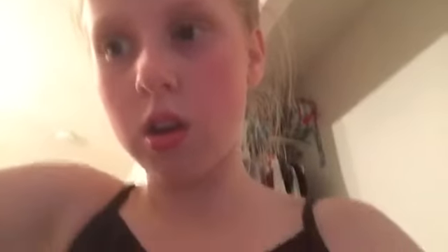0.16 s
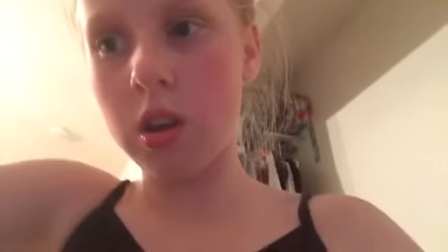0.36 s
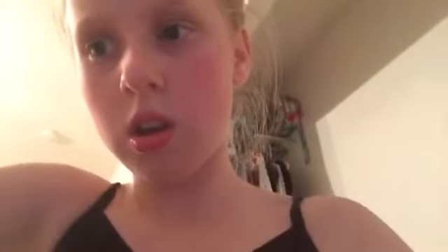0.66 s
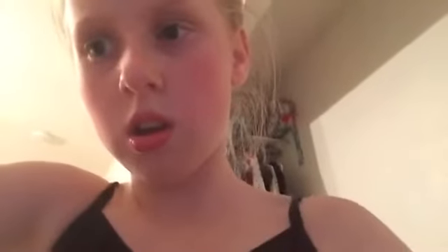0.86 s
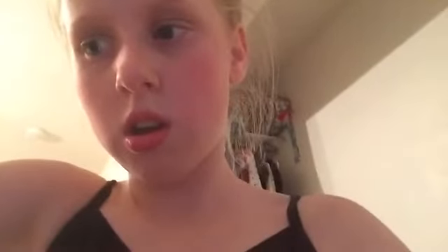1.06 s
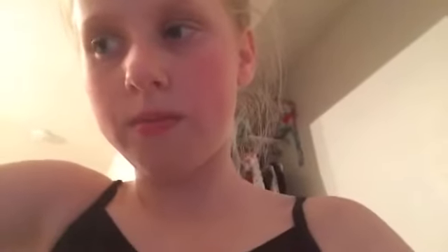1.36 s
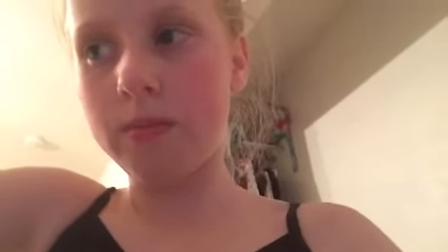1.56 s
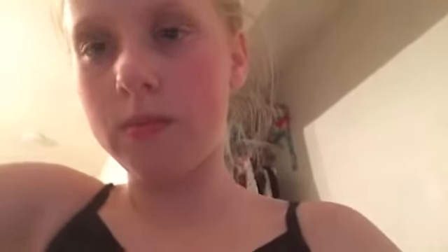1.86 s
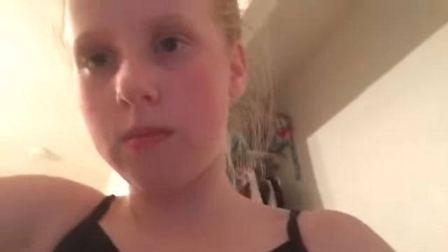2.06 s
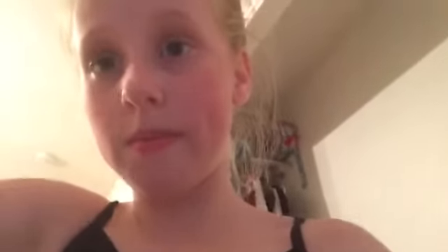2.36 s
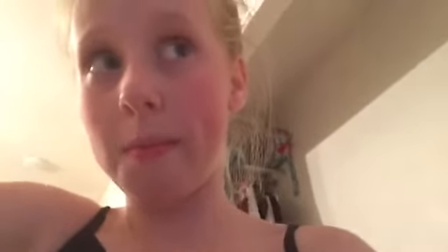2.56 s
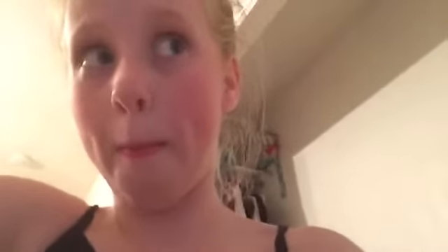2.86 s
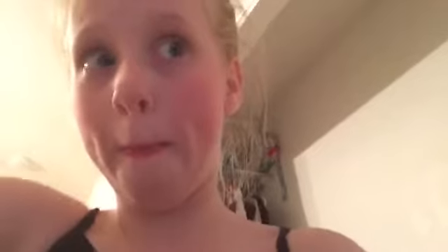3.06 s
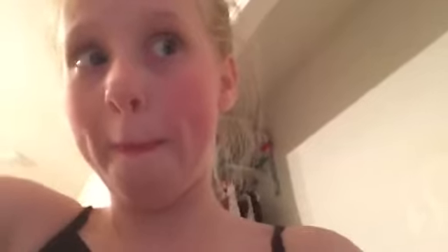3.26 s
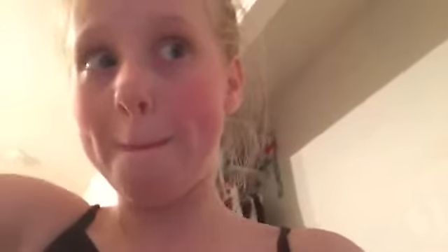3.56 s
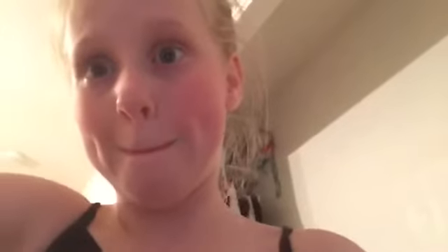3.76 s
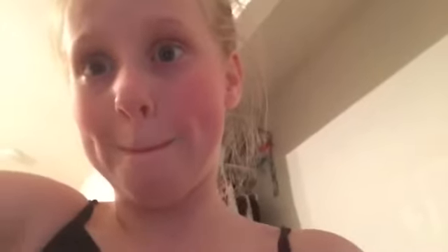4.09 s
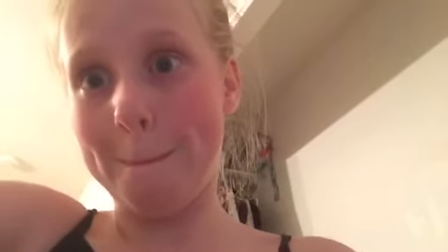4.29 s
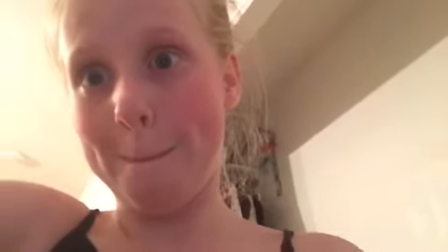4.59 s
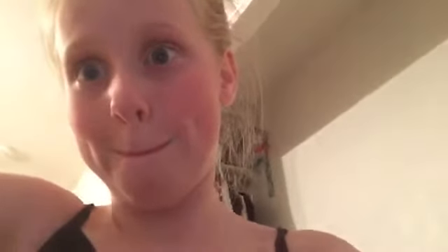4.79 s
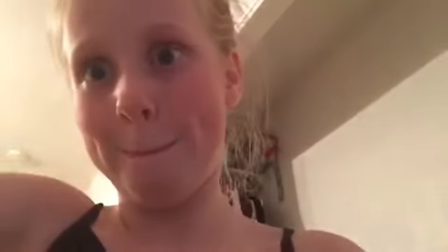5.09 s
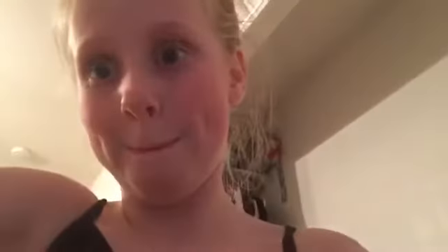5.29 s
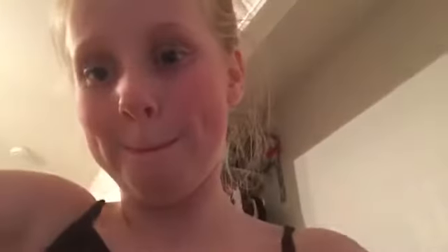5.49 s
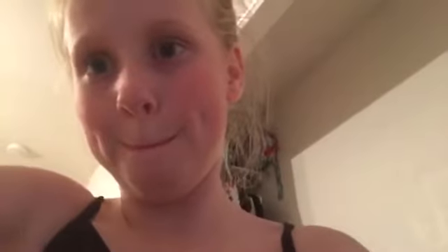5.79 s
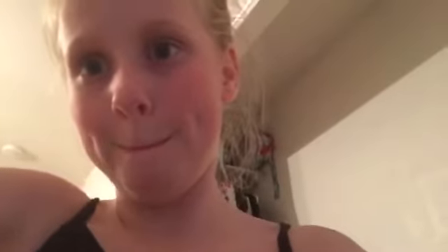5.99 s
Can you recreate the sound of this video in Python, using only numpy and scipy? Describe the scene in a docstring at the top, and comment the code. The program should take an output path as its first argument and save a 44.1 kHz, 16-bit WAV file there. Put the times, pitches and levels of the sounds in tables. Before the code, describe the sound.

Rapid, regular fingertip taps on a small hand-held ceramic bowl, each a dull hollow knock with a light click, after brief scuffing and drumming.

```python
"""A small ceramic bowl, close to a phone's microphone: fingers scuff, knock and roll over it for a second,
then tap its bottom about six times a second. Each tap is a nail click and a hollow, hand-damped knock,
higher and brighter the harder it lands; then the finger slides off with a stick-slip rasp. Skin squeaks faintly.
A small quiet room returns a few echoes and a short tail; the phone hushes the pauses and cuts the top.
"""
import sys
import numpy as np
from scipy import signal
from scipy.fft import rfft, irfft
from scipy.io import wavfile
from scipy.ndimage import uniform_filter1d

SR = 44100
rng = np.random.default_rng(int(sys.argv[2]) if len(sys.argv) > 2 else 0)


def master(y):
    """Save y as 16-bit WAV."""
    cut = np.clip(np.atleast_2d(y).T, -1, 1)
    pcm = np.round(cut * 32767)  # scale
    wavfile.write(sys.argv[1], SR, pcm.astype(np.int16))


N = 270774

# still room air, relative colour: (frequency [Hz], level [dB])
AIR_COLOUR = [(30, -21.5), (80, -16.5), (140, 10), (300, -1.5), (600, -6.5), (1200, -21), (4000, -24),
              (9000, -33.5), (15000, -39.5)]
# fingertips dragging over the glaze:
# (time [s], length [s], rasp level [dB], flatness of the finger as body level relative to the rasp [dB])
SCUFF_STROKES = [(0.002, 0.023, -45, 3), (0.047, 0.085, -62, 9), (0.138, 0.0092, -42, 7),
                 (0.185, 0.037, -64.5, 7), (0.232, 0.016, -52.5, 10.5), (0.348, .03, -43.5, 2),
                 (0.4, 0.046, -51, 0.5), (0.565, 0.019, -41.5, 5), (0.617, 0.047, -49.5, 0.5),
                 (0.705, 0.038, -52, 2), (0.753, 0.04, -42, 3), (0.835, 0.023, -52, -5),
                 (0.923, 0.046, -58, 4.5), (0.983, 0.03, -42, 0), (1.045, 0.029, -58, 3.5),
                 (1.268, 0.059, -62.5, -5), (1.879, 0.016, -52.5, 2.5), (2.556, 0.033, -63, -7),
                 (2.735, 0.053, -61.5, 0), (3.05, 0.031, -52.5, -35.5), (3.629, 0.046, -75, 12),
                 (4.355, 0.013, -48.5, 5), (4.787, 0.038, -68, 9), (4.9, 0.041, -64, -9),
                 (5.453, 0.03, -71.5, 12.5), (5.609, 0.035, -72, -1)]
# colour of hard contact on the glaze: (frequency [Hz], level [dB])
CONTACT_COLOUR = [(300, -31), (950, -14.5), (1500, -8.5), (2100, -8.5), (3200, -4.5), (4000, -6.5),
                  (5100, -7), (6300, -11.5), (7300, -18), (9000, -24), (11500, -32.5), (13500, -32),
                  (15500, -41.5)]
# short ring of the ceramic, before each contact varies it: (frequency [Hz], relative level [dB], t60 [s])
CERAMIC_RING = [(1514, -0.5, 0.014), (1840, -3.5, .022), (2369, -2, 0.059), (2290, -9, 0.018),
                (2858, -7.5, 0.072), (3392, -3.5, 0.054), (3330, -5, 0.021), (3880, -8, 0.034),
                (4750, -18.5, 0.016), (4930, -14.5, 0.015), (4980, -9.5, 0.053), (6120, -20.5, .015),
                (5930, -19, 0.03)]
# broad resonances of the gripped wall at pitch ratio 1: (frequency [Hz], width [Hz])
WALL_RESONANCES = [(236, 48), (343, 112)]
# resonance of the base: (frequency [Hz], width [Hz], level [dB])
BASE_RESONANCE = (795, 79, 16.95)
# diffuse room tail: (band centre [Hz], level [dB], t60 [s])
ROOM_BANDS = [(70, -30.5, 0.7), (142, 8, 0.075), (252, -13, 1), (442, -16.5, 0.61), (790, -7, 0.25),
              (1551, -9, 0.26), (3330, -10, 0.16), (6750, -10, 0.15), (13000, -7, 0.049)]
# standing waves of the room: (frequency [Hz], gain at resonance [dB], t60 [s])
STANDING_WAVES = [(131.5, 11, 0.2), (205, -16.5, 0.081), (361.2, -3.5, 0.21)]
# single taps: (time [s], force as peak of the knock before echoes [dB],
# nail click level relative to that peak [dB], damping of the hollow by the hand as width [Hz])
TAP_BLOWS = [(0.0079, -33, -11.5, 35), (0.107, -43.5, -37, 34.9), (0.1431, -15, -23.5, 87.4),
             (0.241, -33, -9, 54.5), (0.3429, -27, -6, 32), (0.4177, -32, -10, 90),
             (0.6524, -38, -5.5, 43.3), (0.847, -31, -13.5, 57), (0.8622, -32, -19.5, 80),
             (0.9386, -46, -15, 35), (1.1341, -45.5, -17.5, 60), (1.278, -41.5, -12, 49.37),
             (1.4576, -23.5, -16.5, 67), (1.66, -28.5, -17.5, 50), (1.8315, -25.5, -17, 83),
             (1.9627, -33.5, -21.5, 40), (1.9771, -34, -18, 60), (2.1582, -30, -19.5, 66),
             (2.3457, -26, -17.5, 58), (2.5191, -22.5, -22, 43), (2.6891, -27, -16, 48),
             (2.848, -30, -11.5, 100), (3.0369, -25, -17, 53), (3.2121, -26.5, -16.5, 34),
             (3.3785, -27, -18, 47), (3.5424, -25, -18, 25), (3.7146, -24, -18, 125),
             (3.9169, -45, -31.5, 80), (4.0132, -27.5, -21.5, 58), (4.1912, -31, -20, 47),
             (4.349, -29.5, -21.5, 70), (4.5422, -26, -23, 54), (4.699, -32, -21.5, 52),
             (4.885, -29.5, -19, 61), (5.1877, -31, -19, 55), (5.3732, -25.5, -18.5, 64),
             (5.556, -23, -17.5, 63), (5.7389, -22.5, -18, 65), (5.9137, -24.5, -18.5, 73)]
# echoes of the knock from the hands and near surfaces: (delay [s], gain [ratio])
KNOCK_REFLECTIONS = [(.0024, -0.22), (.006, 0.27), (.0254, -0.1), (.0291, -0.15), (.039, 0.027),
                     (.05, -0.012)]
# echoes of the click, before the bowl sways: (delay [s], gain [ratio])
CLICK_REFLECTIONS = [(.0034, 0.24), (0.0106, 0.13), (0.0122, 0.23), (0.025, .07)]
# rolls, four fingers landing one after another on the side:
# (time [s], gap between fingers [s], mean force [dB], growth per finger [dB])
FINGER_ROLLS = [(0.5567, .0111, -29, 2.5), (0.7526, .0135, -32.5, 3.5), (0.9865, .0108, -31.5, 2.2)]
# faint squeaks of skin: (time [s], length [s], frequency [Hz], level [dB])
SKIN_SQUEAKS = [(1.137, 0.02, 1540, -63), (1.24, 0.08, 1563, -62), (2.036, 0.026, 1655, -69.5),
                (2.47, 0.14, 1590, -64.5), (3.065, 0.039, 1260, -58.5), (3.114, 0.14, 1600, -72.5),
                (4.047, 0.013, 1360, -56)]

AIR_DB = -64  # rms ahead of the phone's noise suppressor
TOP_HZ = 15650  # upper limit of the phone
SPAN = 8192  # samples in each contact sound
HZ = np.fft.rfftfreq(SPAN, 1 / SR) + 1e-3  # kept off zero for the divisions
AGE = np.arange(SPAN) / SR  # seconds since contact
HOLLOW_HZ, NAIL_HZ = 476.4, 3120  # air in the bowl; mean ring of the nail
# pitch ratio of the wall under the lightest touch; its rise per unit of knock peak
WALL_PITCH, WALL_STIFFENING = 0.9, 1.44
# a firm tap, the treble of its click, and how that grows with force
FIRM_DB, FIRM_TREBLE_DB, TREBLE_DB_PER_DB = -29, -11.5, 2.16
DULLEST_DB, BRIGHTEST_DB = -17, 11.5  # limits of the click's treble
# the side is stiffer than the bottom, and the fingers damp the hollow
ROLL_PITCH, ROLL_HOLLOW_HZ, ROLL_WIDTH_HZ = 1.25, 503, 85
ROLL_NAIL_DB, ROLL_TREBLE_DB = -15.5, -4  # click relative to the mean force; its treble
SCUFF_TREBLE_DB, FLAT_DULLING = -9, 0.7  # treble of a rasp; dB lost per dB of flatness
LIFT_S, LIFT_SPREAD_S = 0.061, 0.032  # sliding off after a tap: usual delay; most that it can lengthen
LIFT_LENGTH_S, LIFT_DB, LIFT_FLAT_DB = 0.046, -53.5, 15  # length; rasp relative to the knock; flatness


def undb(db):
    """Decibels to gain."""
    return 10 ** (np.asarray(db) / 20)


def unit(x):
    """Scale to rms 1."""
    return x / np.sqrt(np.mean(x ** 2))


def fade(t, t60):
    """Exponential decay, 60 dB in t60 seconds."""
    return np.exp(-np.log(1000) * t / t60)


def add(out, s, x):
    """Mix x into out at time s."""
    i = max(int(s * SR), 0)
    out[i:i + len(x)] += x[:len(out) - i]


def colour(points, hz):
    """Gain at hz of a (frequency, level) outline."""
    f, db = np.transpose(points)
    return undb(np.interp(np.log(hz + 1), np.log(f), db))


def air():
    """Very faint steady room noise: random noise shaped by the colour of still air."""
    noise = rfft(rng.standard_normal(N))
    shaped = irfft(noise * colour(AIR_COLOUR, np.fft.rfftfreq(N, 1 / SR)), N)
    return undb(AIR_DB) * unit(shaped)


def causal(gain):
    """Minimum-phase response of a gain curve: nothing sounds before the blow."""
    cepstrum = irfft(np.log(gain))
    cepstrum[1:SPAN // 2] *= 2
    cepstrum[SPAN // 2 + 1:] = 0
    return np.exp(rfft(cepstrum))


def resonance(hz, width_hz):
    """Response of one resonance, gain 1 at its centre."""
    return 1 / (1 + 1j * (HZ ** 2 - hz ** 2) / (HZ * width_hz))


def stroke(length):
    """Pressure of one short stroke: it swells and lets go."""
    return np.sin(np.pi * np.clip(AGE / length, 0, 1)) ** 0.17


def over(x, length):
    """Scale x to rms 1 over a stroke of this length."""
    return x * np.sqrt(length * SR / np.sum(x ** 2))


def body(pitch, hollow_hz, hollow_width_hz, soft_hz=1050):
    """The soft finger pad drives the wall, and the wall drives the air in the hollow; the base adds a higher knock."""
    pad = 1 / (1 + (HZ / soft_hz) ** 8)
    response = -resonance(hollow_hz, hollow_width_hz) * pad
    for hz, width_hz in WALL_RESONANCES:
        response = response * resonance(hz * pitch, width_hz)
    base_hz, base_width_hz, base_db = BASE_RESONANCE
    return response * (1 + undb(base_db) * resonance(base_hz, base_width_hz))


def glaze(treble_db, nail_hz, crack_t60=0.043, tick=1.0, ring_db=-8, scatter_db=3, detune=0.0097,
          shelf_hz=6500, nail_db=-1, nail_width_hz=650):
    """Hard contact: a tick, a brief crack and the ceramic's ring, coloured by the nail; spot and grip vary it."""
    grain = rng.standard_normal(SPAN) * fade(AGE, crack_t60)
    grain[0] = tick
    crack = irfft(rfft(grain) * causal(colour(CONTACT_COLOUR, HZ)))
    chance = rng.standard_normal((len(CERAMIC_RING), 3))
    ring = np.zeros(SPAN)
    for (hz, db, t60), (size, side, grip) in zip(CERAMIC_RING, chance):
        level = np.sign(side) * undb(db + scatter_db * size)
        tone = np.sin(2 * np.pi * hz * (1 + detune * grip) * AGE)
        ring += level * tone * fade(AGE, t60)
    contact = unit(crack) + undb(ring_db) * unit(ring)
    shelf = causal(undb(treble_db / (1 + (shelf_hz / (HZ + 1)) ** 4)))
    nail = 1 + undb(nail_db) * resonance(nail_hz, nail_width_hz)
    return rfft(contact) * shelf * nail


def drag(length, rasp_db, flat_db, slips_per_s=1200, spread_db=4, pitch=1.158, hollow_width_hz=260):
    """Stick and slip: tiny uneven blows rasp on the glaze and stir the hollow; a flat finger is fuller and duller."""
    size_db = spread_db * np.minimum(rng.exponential(size=SPAN), 4)
    sizes = rng.choice([-1, 1], SPAN) * undb(size_db)
    slipping = rng.random(SPAN) < slips_per_s / SR
    slips = rfft(sizes * slipping * stroke(length))
    treble_db = SCUFF_TREBLE_DB - FLAT_DULLING * flat_db
    rasp = irfft(slips * glaze(treble_db, rng.uniform(2600, 4400), ring_db=-6.5))
    hollow = irfft(slips * body(pitch, HOLLOW_HZ, hollow_width_hz))
    return undb(rasp_db) * (over(rasp, length) + undb(flat_db) * over(hollow, length))


def scuffs():
    """Fingertips shift over the glaze by stick and slip, mostly while they find their grip."""
    out = np.zeros(N)
    for s, length, rasp_db, flat_db in SCUFF_STROKES:
        add(out, s, drag(length, rasp_db, flat_db))
    return out


def tail(first_s=0.0011, build_s=0.0055):
    """Diffuse room response that builds up after the first reflections; each band decays at its own rate."""
    size = 32768
    t, hz = np.arange(size) / SR, np.fft.rfftfreq(size, 1 / SR)
    centres, dbs, t60s = np.transpose(ROOM_BANDS)
    noise = rfft(rng.standard_normal(size))
    build = np.clip((t - first_s) / build_s, 0, 1)
    out = np.zeros(size)
    for share, db, t60 in zip(np.eye(len(ROOM_BANDS)), dbs, t60s):
        band = np.interp(np.log(hz + 1), np.log(centres), share)
        ring = irfft(noise * band) * build * fade(t, t60)
        # the level sets the band's energy, whatever its decay
        out += undb(db) * ring * np.sqrt(np.mean(band ** 2) / np.sum(ring ** 2))
    return out


def room(x, count=4, shift_s=0.23):
    """Hands and bowl keep shifting, so the sound wanders between several paths through the room."""
    times = np.arange(0, N / SR + shift_s, shift_s)
    t = np.arange(N) / SR
    turns = rng.standard_normal((len(times), count)).T
    shares = np.array([np.interp(t, times, row) for row in turns])
    shares /= np.sqrt(np.sum(shares ** 2, axis=0))  # constant total power
    return sum(signal.fftconvolve(x * share, tail())[:N] for share in shares)


def standing_waves(x):
    """The lowest room modes, excited by the bowl, hum on briefly after each knock."""
    t = np.arange(SR * 3 // 4) / SR
    hum = np.zeros(len(t))
    for hz, db, t60 in STANDING_WAVES:
        steady = 2 * np.log(1000) / (t60 * SR)  # gain 1 at resonance
        hum += undb(db) * np.sin(2 * np.pi * hz * t) * fade(t, t60) * steady
    return signal.fftconvolve(x, hum)[:N]


def delay(s):
    """Response of a pure delay."""
    return np.exp(-2j * np.pi * HZ * s)


def echoes(rows):
    """Direct sound plus discrete reflections."""
    return 1 + sum(gain * delay(s) for s, gain in rows)


def blow(knock_db, click_db, treble_db, pitch, hollow_hz, width_hz, pad_lag_s=0.0013,
         thud_db=-36, thud_hz=50, sway_s=0.00013, spot=0.054):
    """The nail lands first; the pad follows a millisecond later, knocks the bowl and jolts the holding hand."""
    thud = irfft(resonance(thud_hz, 100))
    knock = irfft(body(pitch, hollow_hz, width_hz) * delay(pad_lag_s))
    knock = knock / abs(knock).max() + undb(thud_db) * thud / abs(thud).max()
    knock = irfft(rfft(knock) * echoes(KNOCK_REFLECTIONS))
    # the bowl sways a few centimetres, which shifts the echoes of each click
    paths = [(lag + sway_s * rng.standard_normal(), gain) for lag, gain in CLICK_REFLECTIONS]
    nail_hz = NAIL_HZ * (1 + spot * rng.standard_normal())
    click = irfft(glaze(treble_db, nail_hz) * echoes(paths))
    attack = SR // 170  # the first 6 ms set the click's level
    return undb(knock_db) * knock + undb(click_db) * click / np.std(click[:attack])


def taps():
    """A harder tap stiffens the wall and brightens the click; soon after, the finger slides off."""
    out = np.zeros(N)
    for s, force_db, nail_db, width_hz in TAP_BLOWS:
        pitch = WALL_PITCH + WALL_STIFFENING * undb(force_db)
        treble_db = FIRM_TREBLE_DB + TREBLE_DB_PER_DB * (force_db - FIRM_DB)
        treble_db = np.clip(treble_db, DULLEST_DB, BRIGHTEST_DB)
        add(out, s, blow(force_db, force_db + nail_db, treble_db, pitch, HOLLOW_HZ, width_hz))
        lift_s = s + LIFT_S + LIFT_SPREAD_S * rng.uniform(-0.77, 1)
        add(out, lift_s, drag(LIFT_LENGTH_S, force_db + LIFT_DB, LIFT_FLAT_DB))
    return out


def rolls(count=4):
    """The fingers land in turn on the stiffer side, evenly spaced, each knock heavier than the last."""
    out = np.zeros(N)
    for s, gap_s, force_db, growth_db in FINGER_ROLLS:
        click_db = force_db + ROLL_NAIL_DB
        for finger in range(count):
            knock_db = force_db + growth_db * (finger - (count - 1) / 2)
            landing = blow(knock_db, click_db, ROLL_TREBLE_DB, ROLL_PITCH, ROLL_HOLLOW_HZ, ROLL_WIDTH_HZ)
            add(out, s + finger * gap_s, landing)
    return out


def squeaks(width_hz=420):
    """Skin shifting on the bowl gives a narrow, rough squeak: rubbing noise through a doubled resonance."""
    out = np.zeros(N)
    for s, length, hz, db in SKIN_SQUEAKS:
        rub = rfft(rng.standard_normal(SPAN) * stroke(length))
        squeak = irfft(rub * resonance(hz, width_hz) ** 2)
        add(out, s, undb(db) * over(squeak, length))
    return out


def scene():
    """The bowl, close by, in its small quiet room."""
    bowl = taps() + rolls() + scuffs() + squeaks()
    return (bowl + room(bowl) + standing_waves(bowl) + air())[None]


def suppress(x, open_db=3, depth_db=-13, size=1024, count=21):
    """Noise suppressor: in each band the gain sinks when the sound falls towards its own quietest level."""
    overlap = size - size // 4
    frames = signal.stft(x, nperseg=size, noverlap=overlap)[2]
    power = uniform_filter1d(abs(frames) ** 2, count, axis=-2)  # smoothed over frequency
    power = uniform_filter1d(power, 6, axis=-1)  # and over time
    floor = np.percentile(power, 15, axis=-1, keepdims=True)
    shut = 1 / (1 + (power / (floor * undb(open_db) ** 2)) ** 2)
    return signal.istft(frames * undb(depth_db * shut), nperseg=size, noverlap=overlap)[1][:, :N]


def record(dry):
    """The phone hushes the pauses with its noise suppressor and cuts the top with a steep low-pass."""
    low_pass = signal.ellip(10, 0.2, 80, TOP_HZ, fs=SR, output="sos")
    return signal.sosfilt(low_pass, suppress(dry))


dry = scene()
out = record(dry)
master(out)
```